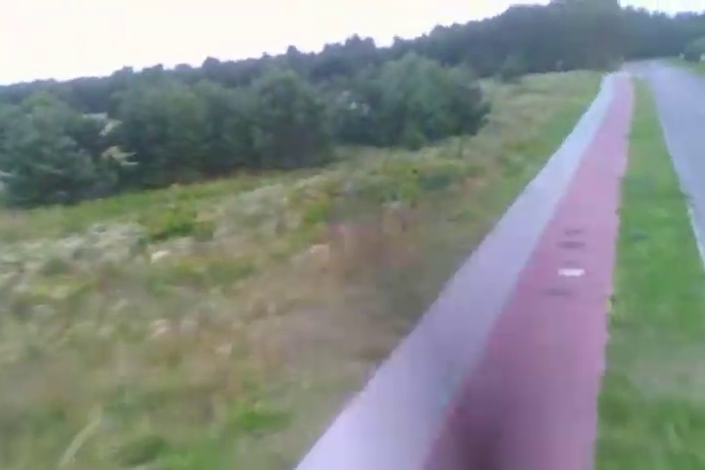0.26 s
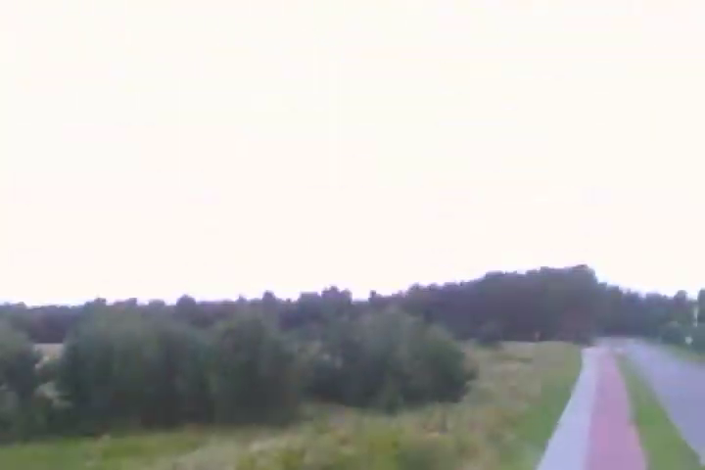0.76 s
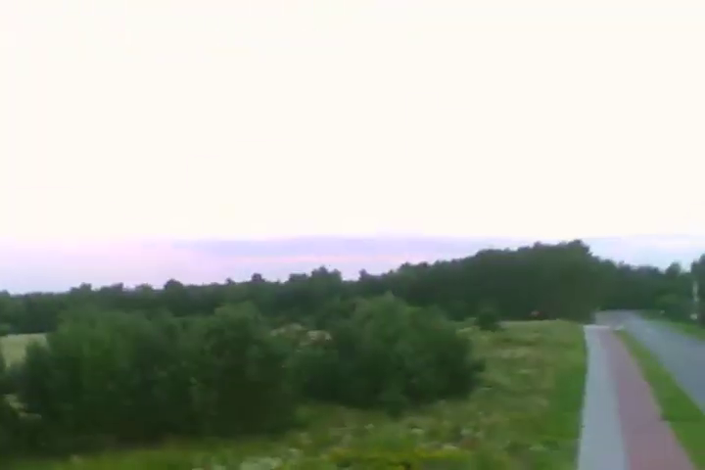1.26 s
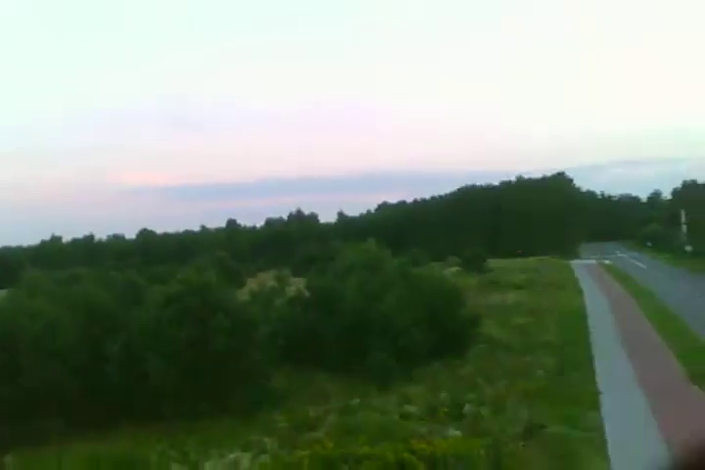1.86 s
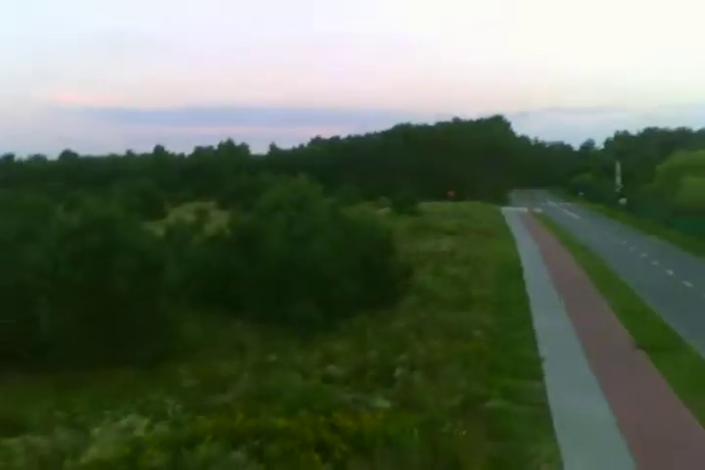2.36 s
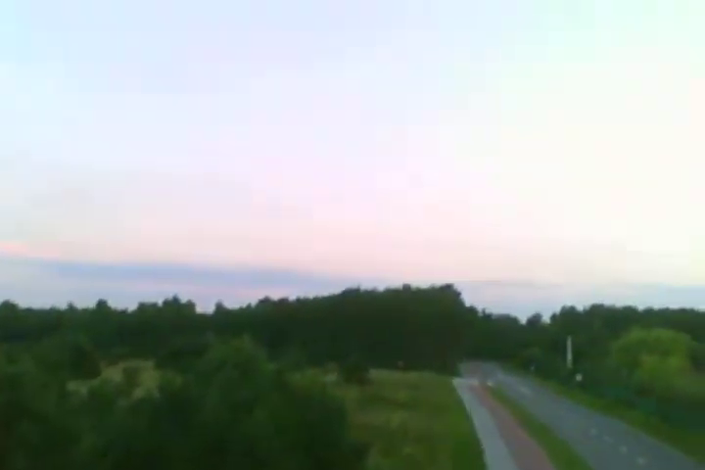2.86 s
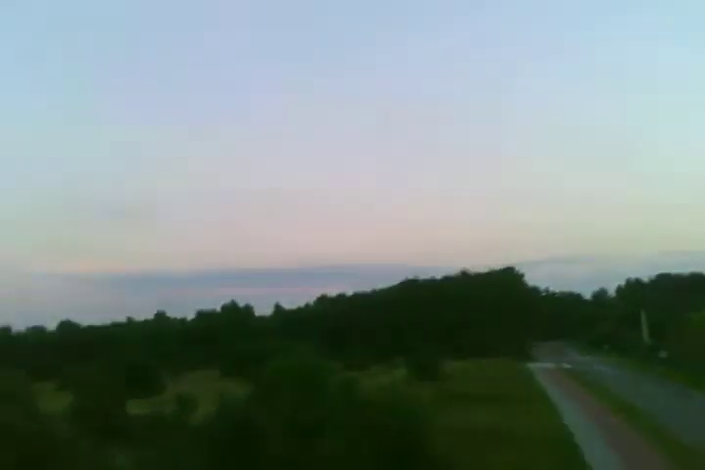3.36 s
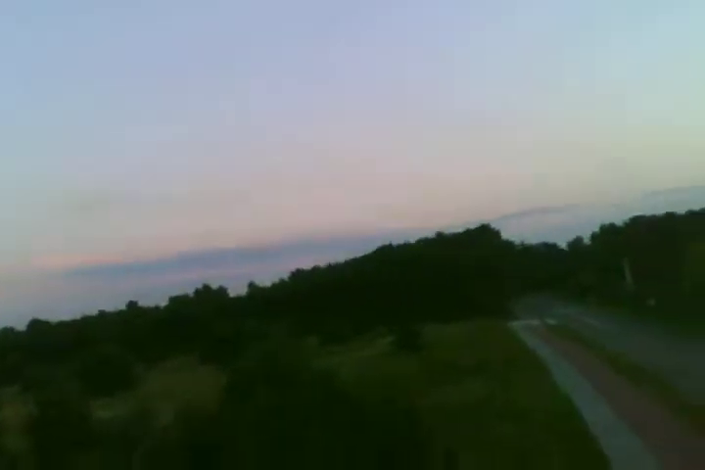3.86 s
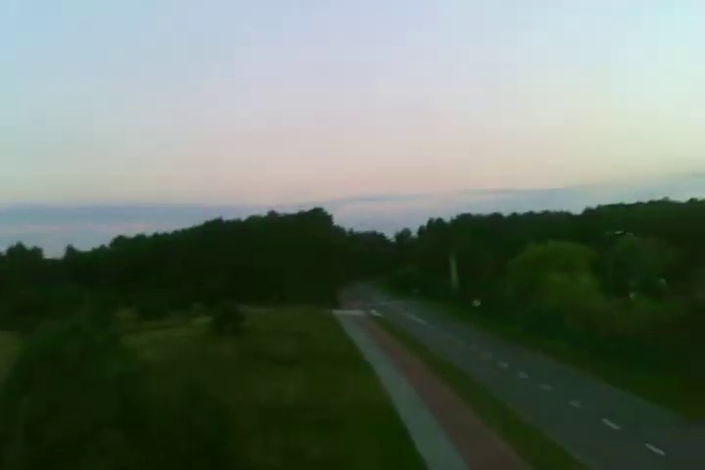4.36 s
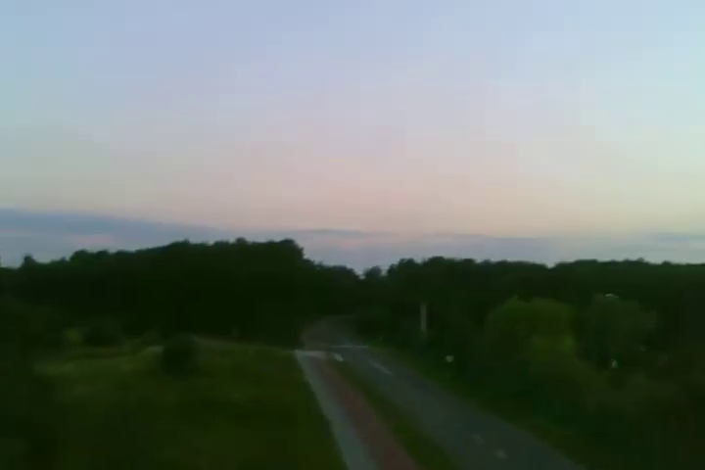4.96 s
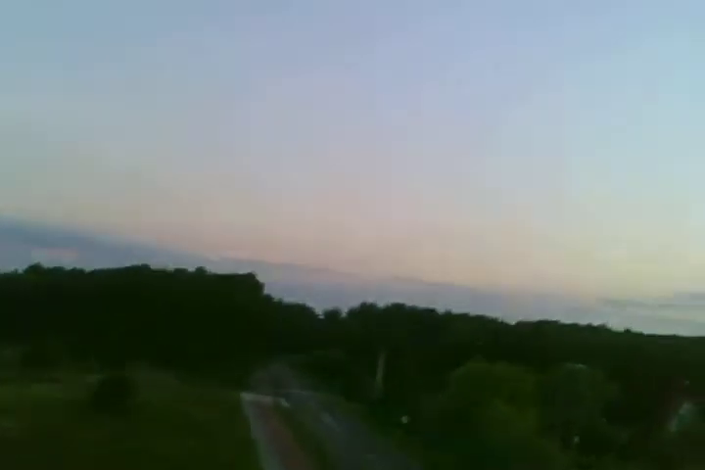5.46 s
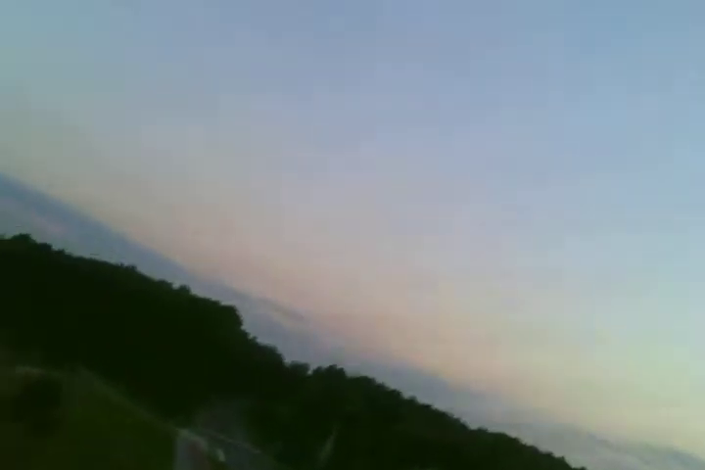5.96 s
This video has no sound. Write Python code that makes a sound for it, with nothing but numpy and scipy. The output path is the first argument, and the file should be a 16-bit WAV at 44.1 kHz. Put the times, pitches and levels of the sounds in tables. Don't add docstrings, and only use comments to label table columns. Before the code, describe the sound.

Heard from a tiny camera just behind a model plane's propeller in open air: short, fluttering wind buffets come quickly, then farther apart, over thin airframe hiss. About two seconds in, the electric motor whirs up, pitch rising fast into a loud, raspy propeller buzz with roaring slipstream, then climbing slightly higher to full power and holding to the end.

```python
import sys
import numpy as np
from scipy import signal
from scipy.fft import rfft, irfft, next_fast_len
from scipy.io import wavfile
from scipy.ndimage import uniform_filter1d

SR = 44100
rng = np.random.default_rng(int(sys.argv[2]) if len(sys.argv) > 2 else 0)


def unload_audio(sound):
    columns = np.transpose(np.atleast_2d(sound))
    steps = np.round(np.clip(columns, -1, 1) * 32767)
    wavfile.write(sys.argv[1], SR, steps.astype(np.int16))


def rack_gain(trim_db):
    fader = np.asarray(trim_db, float)
    return 10 ** (fader / 20)


N = 274390
TIME = np.arange(N) / SR

# start in seconds, settling time in seconds, shaft speed gained in Hz.
THROTTLE = [
    (2.076, .881, 127.9),
    (4.33, .74, 13.1),
]
# time in seconds, thump level in dB, slant of the inflow from 0 to 1,
# share of the tip vortex that sweeps the microphone.
THUMP = [(2.2, -51, .2, 0.), (2.24, -33, 0.1, .02), (2.3, -28, 0.04, .05), (2.4, -28, 0.21, 0.066),
         (2.48, -29.5, 0.23, 0.27), (2.59, -26.5, 0.35, .3), (2.7, -27, 0.44, .3), (2.77, -30.5, 0.5, .1),
         (2.88, -21.5, 0.02, 0), (3.4, -18, 0.22, .12), (3.74, -22.5, 0.66, 0.59), (4.32, -20, 0.33, 0.091),
         (4.54, -16.5, 0.33, 0.22), (4.86, -18, 0.43, 0.17), (5.14, -18, 0.71, 0.23), (5.46, -22.5, .68, 0),
         (5.82, -17.5, 0.86, 0), (6.22, -22, 0.87, .02)]
# frequency in Hz, level in dB per Hz.
WASH = [(400, -5.5), (900, -6.5), (1500, -10), (2500, -11.5), (3500, -14), (4200, -17.5), (4800, -25),
        (5900, -23), (6500, -26), (7300, -36.5), (8700, -28.5), (10000, -35), (11500, -46), (12300, -55)]
# frequency in Hz, level in dB per Hz.
ROAR = [(70, -11), (120, 1.5), (220, -3), (400, -8), (700, -16.5), (1100, -43), (1800, -30)]
# frequency in Hz, level in dB rms.
CAN = [(1500, -79), (3100, -68), (4900, -66), (5250, -53), (5400, -49), (5700, -51), (5850, -59),
       (6600, -64)]
# start in seconds, end in seconds, buffet level in dB,
# pressure swing in dB, treble in dB over the buffet.
WAKES = [(-.01, 0.065, -24.5, -20, 2.5), (0.199, 0.267, -26.5, -15, 6), (0.403, 0.47, -23.5, -18, 2.5),
         (.573, 0.627, -37.5, -29, 6), (0.621, 0.684, -23, -32, 5), (0.784, 0.852, -40, -43, -7),
         (0.849, 0.929, -24.5, -18.5, 0), (1.104, 1.211, -27, -27, 1.5), (1.399, 1.505, -28.5, -24, -1),
         (1.7, 1.715, -55, -49, -6), (1.728, 1.841, -29, -25, -4), (1.842, 1.852, -33, -41, 4),
         (2.055, 2.097, -31.5, -23.5, -10), (2.111, 2.137, -33, -22, 2), (2.139, 2.209, -33, -37, 3)]
# time in seconds, peak level in dB.
EDDIES = [(0.024, -23), (0.196, -27), (0.208, -26), (0.218, -23), (0.403, -25), (0.432, -22), (0.578, -30),
          (0.611, -28), (0.629, -24), (0.81, -30), (0.85, -23), (0.868, -26), (0.897, -23), (0.917, -25),
          (1.108, -26), (1.146, -25), (1.156, -26), (1.391, -30), (1.413, -27), (1.705, -36), (1.728, -34),
          (1.758, -24), (1.776, -27), (1.824, -27), (1.845, -27), (2.054, -28), (2.071, -29), (2.117, -21),
          (2.147, -20), (2.186, -29)]
# frequency in Hz, level in dB per Hz.
BUFFET = [(70, -19), (120, 1), (200, -6), (370, -9.5), (600, -15.5), (1100, -20), (1700, -24.5),
          (2700, -30), (3800, -39), (4900, -46), (7400, -51), (8600, -49), (10000, -59), (11500, -78)]
# frequency in Hz, level in dB per Hz.
SHAKE = [(5, 5), (20, -0.5), (50, -4), (100, -7), (180, -27.5), (400, -33)]
# time in seconds, level in dB.
GUSTS = [(2.52, -3), (2.61, 4), (2.72, 2), (3.01, 8), (3.95, 0), (4.28, 8), (4.55, -6), (4.6, -2),
         (4.991, 1), (5.13, 0), (5.29, -12), (5.335, -28)]
# frequency in Hz, level in dB per Hz.
AIRFRAME = [(59, -34), (100, 0.5), (220, -3), (412, -15), (870, -20), (1570, -28), (2620, -29), (3590, -26),
            (5310, -39), (5750, -30), (7000, -42), (7570, -48), (8030, -37), (9970, -42.5), (11000, -46),
            (14300, -75), (22000, -120)]
# frequency in Hz, level in dB per Hz.
EDGE_AIR = [(500, -9), (1500, -8), (3000, -1), (4000, -4.5), (4600, -13.0), (8500, -24), (10500, -35)]
# time in seconds, frequency in Hz, level in dB.
SQUEAK = [
    (.472, 8500, -57),
    (.485, 8550, -58),
    (.505, 8100, -58),
    (.55, 8400, -57),
    (.57, 8350, -57),
    (.582, 8850, -59),
    (.596, 8800, -59),
    (.605, 8200, -65),
    (.613, 9000, -68),
]
# time in seconds, length in seconds, frequency in Hz, level in dB.
FAINT_SQUEAKS = [
    (.17, .04, 8500, -73),
    (.34, .03, 8300, -76),
    (.69, .008, 8400, -68),
    (.73, .008, 8000, -70),
    (.74, .04, 2750, -62),
]
# frequency in Hz, level in dB rms.
CAMERA_LINES = [(5599, -83), (7402, -80), (9598, -86)]

CRUISE_HZ = 127.9
NARROW_TURNS, WIDER_TURNS, WEAKENING, LAG_TURNS, LAG_SWING_TURNS = 0.033, 0.052, 0.7, 0.02, 0.051
UNBALANCE_DB, SHARPER_FALL = -11.5, 0.13
REBOUND_LAG_TURNS, REBOUND_WIDTH_TURNS = 0.18, 0.053
STREAM_S, HISS_DB, ROAR_DB, TREBLE_DB, TOP_DB = 2.18, -32, -28.5, -44.5, -51
HISS_POWER, ROAR_POWER, TREBLE_POWER, TOP_POWER = 3.34, 1.64, 3.5, 4.1
CHOP_DB, CHOP_POWER = 2.8, 1.2
BITE_HZ, BITE_SPAN_HZ, UNBITTEN_TREBLE_DB, UNBITTEN_ROAR_DB = 120, 12, -4, -4
POLE_STEPS = 42
MAGNETS_S, BEATS_DB, JERK_S, JERK_LENGTH_S, JERK_DB = 2.16, -19.5, 2.2, .02, -63
SWITCH_HZ, SWITCH_ON_S, SWITCH_RISE_DB_PER_S, SWITCH_START_DB, SWITCH_DB = 7650.5, 1.965, 90, -76, -57.5
SWITCH_FULL_DROP_DB, SKIRT_DB, SKIRT_DB_PER_HZ = 11, -1, .27
EDDY_TREBLE_DB, EDDY_DULLING_DB_PER_S, SMALL_EDDY_BRIGHTER = -34, 7, 0.5
SHAKE_CRUISE_DB, SHAKE_POWER, SHAKE_GUSTY_DB, GUST_S = -23.5, 2, 1, 0.015
SHAKE_CALM_DB, SHAKE_OVER_WAKE_DB, SHAKE_RISE_DB_PER_S, SHAKE_FADE_DB_PER_S = -61, 1.5, 235, 378
GLIDE_DB, SLOWS_S, SLOWING_DB_PER_S, EDGE_DB = -57.5, 0.27, 5.5, 3.3
EDGE_SWELL_S, EDGE_SWELL_LENGTH_S, EDGE_SWELL_DB = 0.8, 0.16, 4


def unit(x):
    return x / np.sqrt(np.mean(x ** 2))


def colour(x, points):
    size = next_fast_len(N + 8192)
    hz, db = np.transpose(points)
    bins_hz = np.arange(size // 2 + 1) * SR / size + 1e-3
    gain = rack_gain(np.interp(np.log(bins_hz), np.log(hz), db, left=-90, right=-120))
    return irfft(rfft(x, size) * unit(gain), size)[..., :N]


def split(x, order, hz, kind="low"):
    return signal.sosfilt(signal.butter(order, hz, kind, fs=SR, output="sos"), x)


def bump(x, centre, width):
    return np.exp(-.5 * ((x - centre) / width) ** 2)


def curves(table):
    s, *columns = np.transpose(table)
    return [np.interp(TIME, s, c) for c in columns]


def walk(rate_hz):
    k = max(int(SR / rate_hz), 1)
    steps = np.repeat(rng.standard_normal(N // k + 1), k)
    return unit(uniform_filter1d(uniform_filter1d(steps, k), k)[:N])


def gusty(*flickers):
    return unit(rack_gain(sum(db * walk(hz) for hz, db in flickers))) * rng.standard_normal(N)


def tone(hz, db):
    return np.sqrt(2) * rack_gain(db) * np.sin(2 * np.pi * np.cumsum(hz * np.ones(N)) / SR)


def law(shaft_hz, cruise_db, power):
    return cruise_db + 20 * power * np.log10(shaft_hz / CRUISE_HZ + 1e-3)


def shaft():
    return sum(hz * (1 - np.clip(1 - (TIME - s) / settle, 0, 1) ** 3) for s, settle, hz in THROTTLE)


def propeller(turns):
    thump_db, slant, vortex = curves(THUMP)
    thump_db = np.where(TIME < THUMP[0][0], -120, thump_db)
    slant = np.clip(slant, 0, 1)
    width = np.clip(NARROW_TURNS + WIDER_TURNS * (1 - slant) ** 1.33, .02, .11)
    weaker = 1 - WEAKENING * slant ** 1.7
    lag = LAG_TURNS + LAG_SWING_TURNS * np.sin(np.pi * slant)
    wander = walk(12)
    total = 0
    for blade, share in enumerate((1, weaker)):
        place = turns - blade * (.5 + lag)
        passage = np.round(place).astype(int)
        chance = rng.standard_normal((1000, 2))[passage]
        u = place - passage + 0.0015 * chance[:, 0]
        size = share * rack_gain(0.5 * chance[:, 1] + 1.23 * wander) * 0.034 / width
        if blade == 0:
            total = total + vortex * size * bump(u, REBOUND_LAG_TURNS, REBOUND_WIDTH_TURNS)
        else:
            width = (1.4 - 0.1 * slant ** 2) * width
        skew = np.where(u < 0, 1.25, .75 - SHARPER_FALL * slant)
        total = total + size * bump(u, 0, width * skew)
    total = split(total, 2, 1500)
    total = total + rack_gain(UNBALANCE_DB) * slant ** 4.25 * np.cos(2 * np.pi * turns)
    return split(rack_gain(thump_db + 15.5) * total, 1, 130, "high")


def slipstream(shaft_hz, turns):
    def gain(db, power):
        return rack_gain(law(shaft_hz, db, power)) * (TIME > STREAM_S)

    unbitten = np.clip((BITE_HZ - shaft_hz) / BITE_SPAN_HZ, 0, 1)
    chop_db = CHOP_DB * (CRUISE_HZ / np.maximum(shaft_hz, 40)) ** CHOP_POWER
    chop = rack_gain(chop_db * np.cos(2 * np.pi * (2 * turns + .2)))
    hiss = gain(HISS_DB, HISS_POWER) * chop * gusty((900, 1.5))
    fine = chop ** 0.2 * gusty((300, 1.2))
    treble = gain(TREBLE_DB + UNBITTEN_TREBLE_DB * unbitten, TREBLE_POWER) * fine
    top = gain(TOP_DB, TOP_POWER) * fine
    roar = gain(ROAR_DB + UNBITTEN_ROAR_DB * unbitten, ROAR_POWER) * gusty((200, 1.))
    hiss = colour(hiss, WASH[:7] + [(5600, -46)])
    treble = colour(treble, [(4200, -32)] + WASH[6:10] + [(8200, -40)])
    top = colour(top, [(6500, -55)] + WASH[9:])
    return hiss + treble + top + colour(roar, ROAR)


def motor(shaft_hz, turns):
    can_hz, can_level_db = np.transpose(CAN)

    def can_db(hz):
        return np.where(TIME > MAGNETS_S, np.interp(np.log(hz + 1), np.log(can_hz), can_level_db), -140)

    steps_hz = POLE_STEPS * shaft_hz
    whine = tone(steps_hz, can_db(steps_hz) + .7 * walk(25)) * (1 + .5 * np.cos(4 * np.pi * turns))
    beats = sum(tone(hz, can_db(hz) + BEATS_DB + 2.5 * walk(82)) for hz in (2 * steps_hz, SWITCH_HZ - steps_hz))
    jerk = tone(2 * steps_hz, JERK_DB + 2 * walk(82)) * bump(TIME, JERK_S, JERK_LENGTH_S)
    rise_db = np.minimum(SWITCH_START_DB + SWITCH_RISE_DB_PER_S * (TIME - SWITCH_ON_S), SWITCH_DB)
    full = np.clip((shaft_hz - CRUISE_HZ) / THROTTLE[1][2], 0, 1)
    switch_db = np.where(TIME > SWITCH_ON_S, rise_db - SWITCH_FULL_DROP_DB * full, -140)
    whistle = tone(SWITCH_HZ, switch_db + 0.57 * walk(40.3))
    skirt_db = np.where(shaft_hz > 0, SKIRT_DB - SKIRT_DB_PER_HZ * np.maximum(shaft_hz, 32), -60)
    skirts = sum(tone(SWITCH_HZ + k * shaft_hz, switch_db + skirt_db - k / 2) for k in (2, 4, 12))
    return whine + beats + jerk + whistle + skirts


def windmill():
    gust, bright, swing = np.zeros((3, N))
    flutter = rack_gain(2.5 * walk(200) + 2.5 * walk(700))
    for start, end, buffet_db, swing_db, treble_db in WAKES:
        u = np.clip((TIME - start) / (end - start), 0, 1)
        edges = np.clip(np.minimum((TIME - start) / .003, (end + .006 - TIME) / .012), 0, 1)
        shape = edges * (0.41 + 0.32 * np.sin(np.pi * u))
        shape /= np.sqrt(np.sum((edges * flutter) ** 2) / np.sum(edges ** 2))
        gust += rack_gain(buffet_db) * shape * flutter
        bright += rack_gain(buffet_db + treble_db) * shape * flutter ** 1.3
        swing -= rack_gain(swing_db) * np.sin(2 * np.pi * u) * np.sin(np.pi * u) ** 0.26
    for s, db in EDDIES:
        treble_db = EDDY_TREBLE_DB - EDDY_DULLING_DB_PER_S * s - SMALL_EDDY_BRIGHTER * db
        age = np.maximum(TIME - s, 0)
        puff = (1 - np.exp(-age / 0.0012)) * np.exp(-age / 0.0021)
        gust += rack_gain(db + 3.5) * puff
        bright += rack_gain(db + treble_db + 26) * puff
    body, treble = colour(np.array([gust, bright]) * rng.standard_normal(N), BUFFET)
    return swing + split(body, 2, 4200) - split(treble, 2, 4200, "high")


def shaking(shaft_hz):
    wakes = 0
    for start, end, db, *_ in WAKES:
        if start < THROTTLE[0][0]:
            before_db = SHAKE_RISE_DB_PER_S * (start - TIME)
            after_db = SHAKE_FADE_DB_PER_S * (TIME - end)
            away_db = np.maximum(np.maximum(before_db, after_db), 0)
            wakes = wakes + rack_gain(db + SHAKE_OVER_WAKE_DB - away_db)
    gust_db = sum(db * bump(TIME, s, GUST_S) for s, db in GUSTS) + SHAKE_GUSTY_DB * walk(14)
    stream = rack_gain(law(shaft_hz, SHAKE_CRUISE_DB, SHAKE_POWER) + gust_db)
    return colour((rack_gain(SHAKE_CALM_DB) + wakes + stream) * rng.standard_normal(N), SHAKE)


def airframe():
    glide_db = GLIDE_DB - SLOWING_DB_PER_S * np.clip(TIME - SLOWS_S, 0, THROTTLE[0][0] - SLOWS_S)
    hiss = colour(rack_gain(glide_db + 13.5) * gusty((12, 1.), (120, 1.5)), AIRFRAME)
    swell_db = EDGE_SWELL_DB * bump(TIME, EDGE_SWELL_S, EDGE_SWELL_LENGTH_S)
    edge = colour(rack_gain(glide_db + EDGE_DB + swell_db) * gusty((25, 1.5)), EDGE_AIR)
    squeak_hz, squeak_db = curves(SQUEAK)
    squeak_db = np.where((TIME > SQUEAK[0][0]) & (TIME < SQUEAK[-1][0]), squeak_db, -140)
    squeak = tone(squeak_hz + 90 * walk(200), squeak_db + 1.4 * walk(122.4))
    for s, length, hz, db in FAINT_SQUEAKS:
        squeak += tone(hz + 120 * walk(90), db + 3 * walk(120)) * bump(TIME, s, length)
    hum = sum(tone(hz + 3 * walk(17), db) for hz, db in CAMERA_LINES)
    return hiss + edge + squeak + hum


def scene():
    shaft_hz = shaft() * (1 + .0008 * walk(6))
    turns = np.cumsum(shaft_hz) / SR
    powered = propeller(turns) + slipstream(shaft_hz, turns) + motor(shaft_hz, turns)
    return (powered + windmill() + shaking(shaft_hz) + airframe())[None]


def band_limit(x):
    return signal.sosfilt(signal.butter(12, 12210, fs=SR, output="sos"), x)


def record(dry):
    rounded = np.tanh(1.205 * dry) / 1.45
    return band_limit(split(rounded, 4, 10800) - .0078)


dry = scene()
out = record(dry)
unload_audio(out)
```